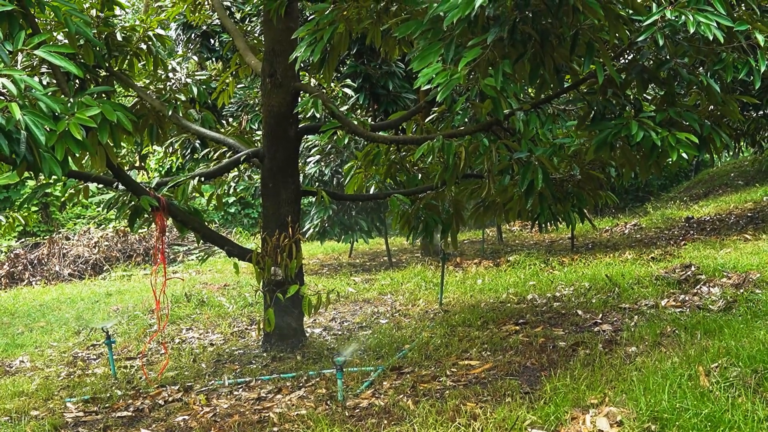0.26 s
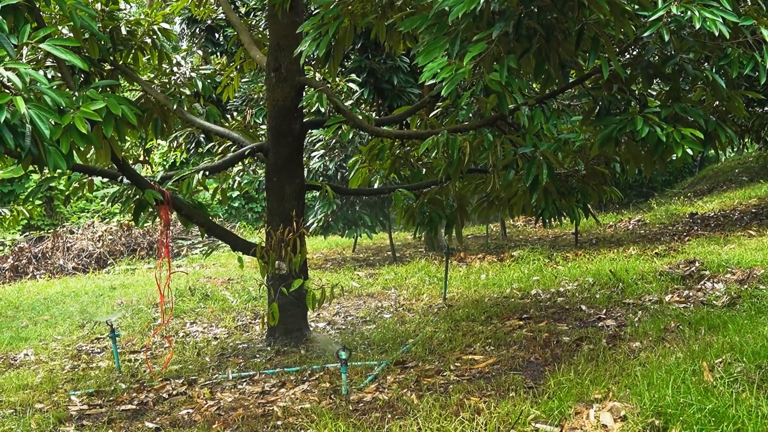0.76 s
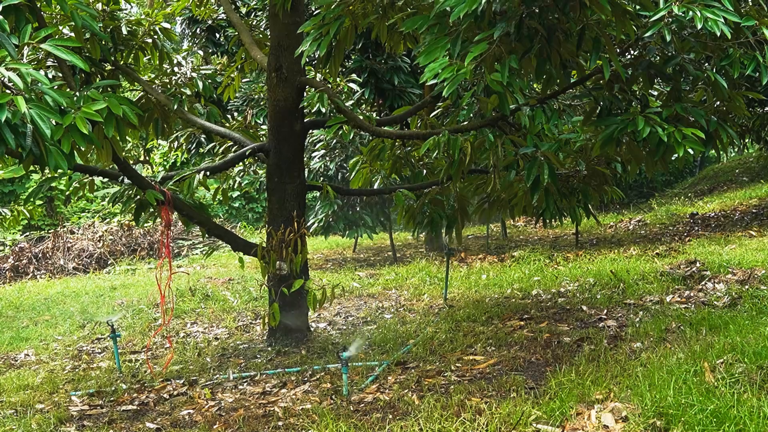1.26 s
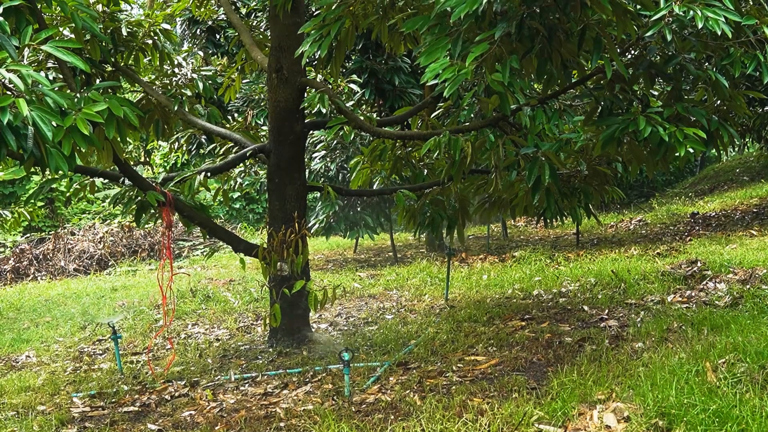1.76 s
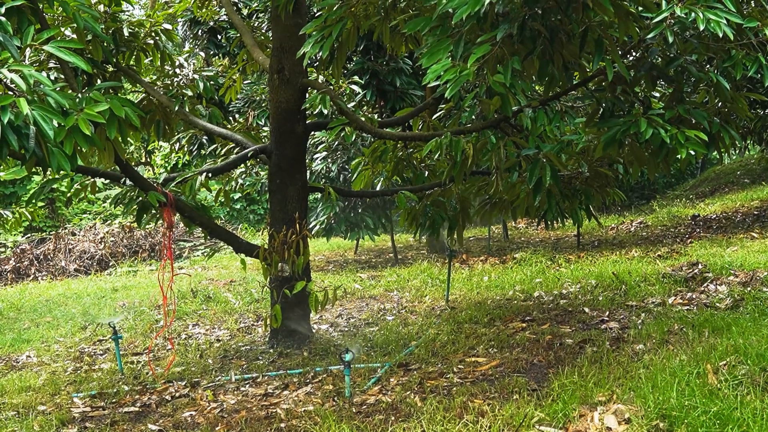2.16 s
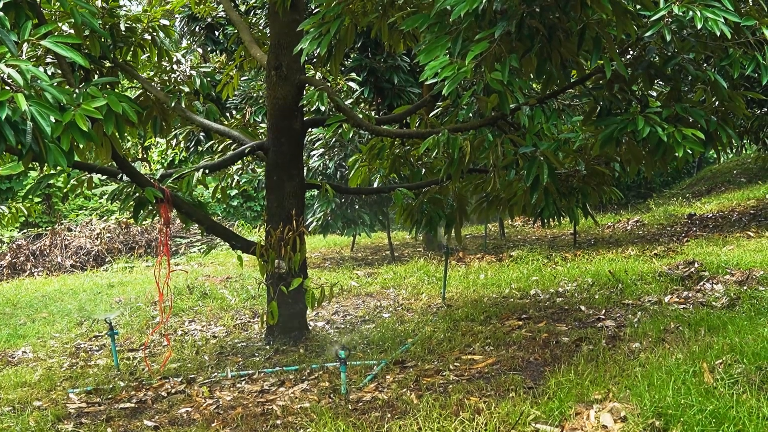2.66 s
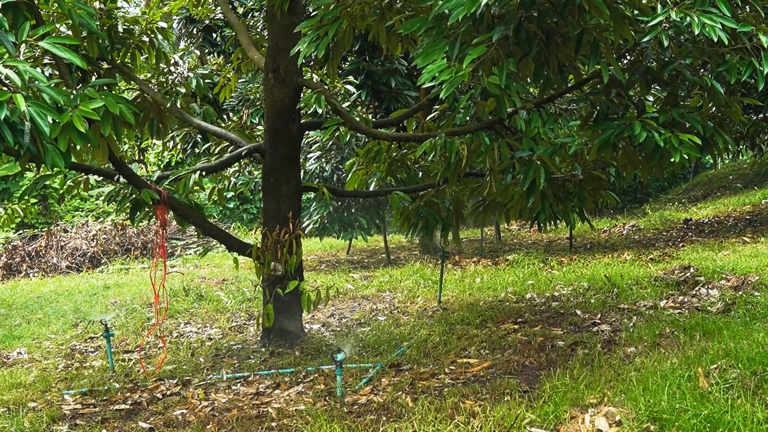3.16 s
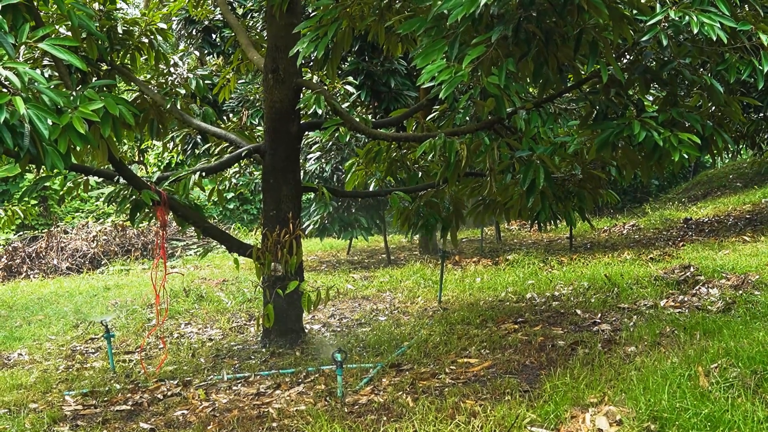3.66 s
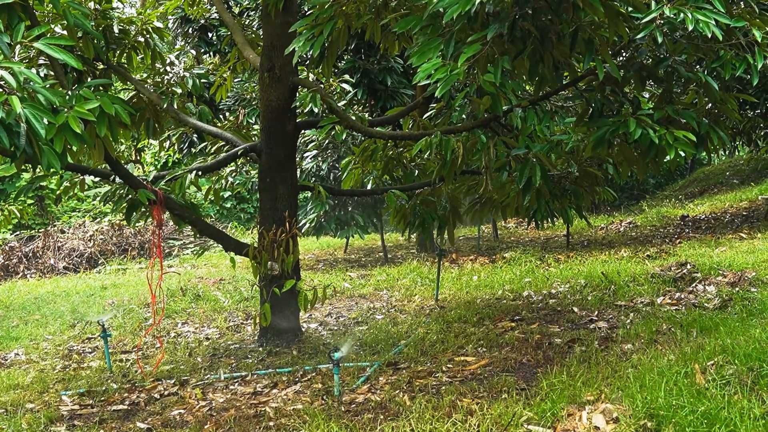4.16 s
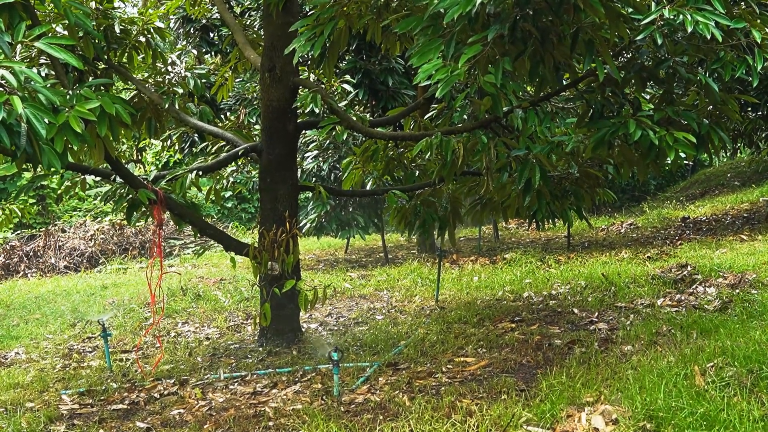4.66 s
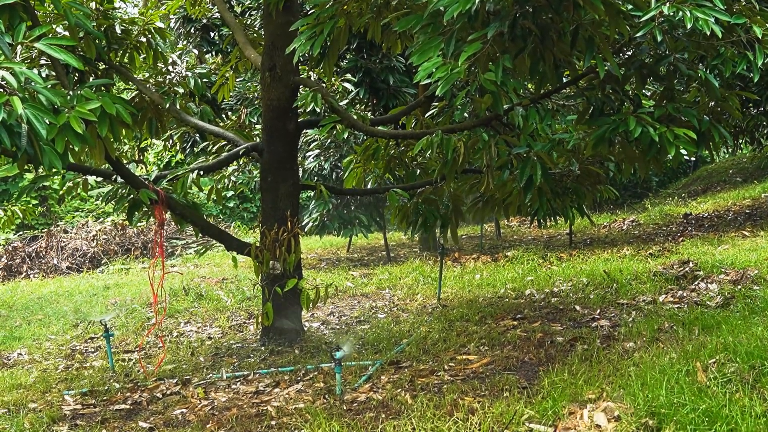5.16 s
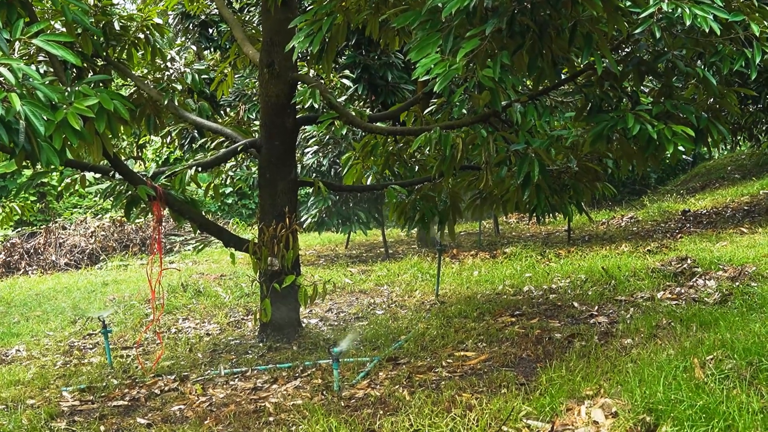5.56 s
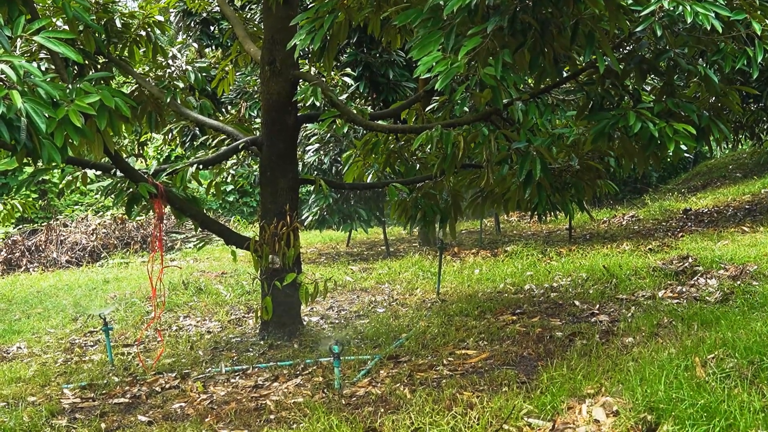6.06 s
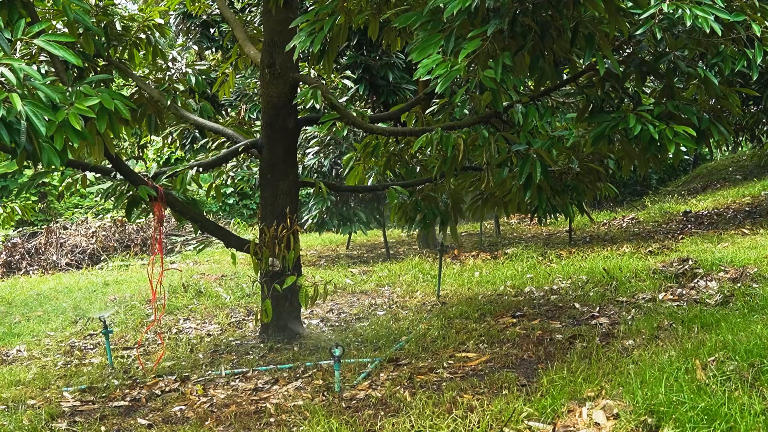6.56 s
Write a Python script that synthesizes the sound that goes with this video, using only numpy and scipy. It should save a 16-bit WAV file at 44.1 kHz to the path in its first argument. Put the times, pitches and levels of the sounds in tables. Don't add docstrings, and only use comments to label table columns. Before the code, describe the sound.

Fluttering sprinkler spray and crisp drips on leaves, with brief high bird whistles, soft distant hoots, a thin insect tone and faint wind rumble.

```python
import sys
import numpy as np
from scipy import signal
from scipy.fft import rfft, irfft
from scipy.io import wavfile
from scipy.ndimage import uniform_filter1d

SR = 44100
rng = np.random.default_rng(int(sys.argv[2]) if len(sys.argv) > 2 else 0)


def decibels_to_gain(level_db):
    exponent = np.asarray(level_db, float) / 20
    return 10 ** exponent


def to_wav(s):
    ch = np.atleast_2d(s).T
    pcm = np.round(np.clip(ch, -1, 1) * 32767)
    wavfile.write(sys.argv[1], SR, pcm.astype(np.int16))


N = 299880
T = np.arange(N) / SR

# (frequency [Hz], level [dB per Hz])
FIZZ = [(1500, -24), (3000, -27), (5000, -1.5), (7500, 0.5), (9600, 2), (11000, -1), (12300, 2),
        (13600, -2), (16000, 1.5)]
# (time [s], speed [turns per s])
FAST_SPIN = [(0, 22.07), (1.4, 21.52), (1.7, 21.22), (3.6, 21.22), (4.2, 21.62), (4.6, 21.32), (5.6, 21.32),
             (6, 21.47), (6.8, 21.44)]
# (time [s], speed [turns per s])
SLOW_SPIN = [(0, 12.5), (1.2, 11.8), (1.9, 13.1), (2.6, 12), (4.5, 11.7), (5.2, 13.2), (6.8, 12.5)]
# (time [s], peak level [dB], lowest frequency [Hz])
DROPS = [(.1576, -17, 4000), (.1626, -23, 900), (.1697, -16, 900), (.9129, -22, 900), (.9262, -25, 6200),
         (1.2111, -21, 900), (1.22, -22, 1900), (1.4232, -13, 1400), (1.7926, -23, 4800),
         (1.8035, -23, 4800), (1.8914, -21, 9400), (2.7098, -24, 900), (2.9537, -20, 900),
         (2.9665, -22, 4800), (2.9703, -22, 6300), (3.6584, -25, 6800), (4.0491, -22, 3500),
         (4.1442, -18, 900), (4.1536, -20, 4300), (4.1889, -23, 1400), (4.5789, -21, 3000),
         (4.8012, -23, 7900), (5.0509, -21, 2900), (5.1085, -24, 900), (5.4562, -15, 900),
         (5.9116, -24, 5300), (5.9209, -24, 900), (5.9407, -21, 900), (5.9805, -25, 8800),
         (5.9835, -24, 9000)]
# (time [s], level [dB], fade time [s],
# centre frequency [Hz])
SHOWERS = [(0.157, -43, 0.028, 3000), (.17, -35.5, 0.036, 6000), (.913, -39, 0.036, 4300),
           (.915, -41, .03, 10000), (1.207, -38, .03, 4200), (1.424, -39, .02, 5000),
           (1.79, -42, .03, 8000), (1.885, -40, .02, 11000), (2.278, -37, .006, 12000),
           (2.955, -37, 0.013, 2500), (2.955, -44, 0.028, 7000), (4.143, -30, 0.0033, 3600),
           (4.152, -37, 0.011, 3500), (4.13, -42, 0.057, 6000), (4.188, -41, 0.023, 9000),
           (5.05, -40, .04, 6500), (5.455, -32, 0.009, 1000), (5.457, -36, .01, 2200),
           (5.458, -41, .03, 5000), (5.92, -39, .04, 5000), (5.968, -38, .03, 10000)]
# (start [s], length [s], top pitch [Hz], opening level [dB], closing level [dB])
WHISTLES = [
    (1.065, 0.1324, 6220, -42.5, -37),
    (4.248, 0.1377, 6100, -38.5, -37),
]
# (start [s], rise time [s], fall time [s], top pitch [Hz], level [dB])
CHIPS = [
    (.929, 0.01, .013, 6300, -40),
    (.963, 0.0071, .004, 6400, -37),
    (4.098, .011, 0.021, 6200, -38.5),
]
# (delay [s], level [dB])
BRANCH_ECHOES = [(.0037, -8), (.0093, -13), (.016, -14)]
# (start [s], first swell pitch [Hz], top pitch [Hz], first swell level [dB], second swell level [dB])
HOOTS = [
    (3.822, 759, 926, -28.5, -38),
    (5.927, 780, 1000, -33, -48),
    (6.317, 810, 890, -33, -41),
    (6.686, 810, 890, -30.5, -36.5),
]
# (start [s], rise time [s], fall time [s], top pitch [Hz], level [dB])
WARBLES = [
    (1.575, .053, 0.028, 730, -44.5),
    (3.965, 0.069, .04, 945, -41.5),
    (4.15, .048, .045, 739, -43.5),
]
# (start [s], length [s], pitch [Hz], level [dB])
OVERTONES = [
    (1.596, .052, 1340, -48),
    (3.97, .055, 1220, -54),
    (4.187, 0.023, 1264, -43),
    (6.325, .02, 1435, -43),
    (6.685, 0.046, 1355, -48.5),
]
# (delay [s], level [dB])
GROUND_ECHOES = [(.0075, -11), (.019, -15)]
# (time [s], level [dB])
INSECT = [(0.0, -54), (0.05, -44.5), (0.97, -44.5), (1.08, -51), (1.19, -46.5), (5.08, -47), (5.15, -53),
          (5.59, -45), (6.16, -48.5), (6.8, -46)]
# (time [s], rate [strokes per s])
STROKES = [(0, 19.2), (1, 18.2), (1.5, 18.7), (3.3, 18.6), (4.3, 19.7), (5.1, 18.2), (6.8, 19.2)]
# (time [s], peak level [dB], half length [s])
GUSTS = [(.05, -37.5, .12), (.62, -40, 0.28), (1.004, -43, .15), (1.38, -33.5, 0.16), (2.06, -31, 0.25),
         (2.626, -38.5, 0.15), (2.96, -30, 0.04), (3.41, -43, 0.47), (4.08, -41.5, 0.28), (4.58, -37, 0.16),
         (5.12, -37.5, .1), (5.775, -39.5, .12)]
# (frequency [Hz], level [dB per Hz])
WIND = [(2, -34), (6, 9), (10, 5.5), (19, 5), (25, -19), (35, -45.5)]
# (frequency [Hz], level [dB per Hz])
FLUTTER = [(15, -30), (24, -16), (35, 11), (50, -5), (70, -12), (120, -49)]
# (frequency [Hz], level [dB per Hz])
MIST = [(35, -33), (60, -2), (152, -7), (413, -10), (1320, -7.5), (1700, -8.5), (3600, -10.5), (4520, -11),
        (5710, -14), (7500, -14.5), (9600, -18), (11000, -20), (12300, -19), (15500, -23)]
# (time [s], level [dB])
MIST_SWELL = [(0.0, 0.5), (6.8, 1)]

HARMONIC_DB = -23


def jets():
    fast = sweep(FAST_SPIN, .45, 1.5)
    slow = sweep(SLOW_SPIN, -.38, .85)
    sputter = decibels_to_gain(2.8 * np.tanh(.5 * wander(.0053)))
    facing = (.3 + .84 * fast + .81 * slow) * sputter
    size_db = 2.6 * np.minimum(rng.exponential(1, (4, N)), 4)
    size = decibels_to_gain(size_db) * rng.standard_normal((4, N))
    droplets_per_s = 2500
    landed = size * (rng.random((4, N)) < droplets_per_s / SR) * facing
    pitches_hz = (4560, 7140, 10400, 13800)
    droplets = sum(resonate(row, hz, 5000) for row, hz in zip(landed, pitches_hz))
    level_db = -47 + 1.7 * wander(.019)
    return decibels_to_gain(level_db) * coloured(droplets, FIZZ)


def sweep(speed, start_turn, sharpness):
    turns = start_turn + np.cumsum(curve(speed)) / SR
    return np.exp(sharpness * (np.cos(2 * np.pi * turns) - 1))


def drops():
    out, t = np.zeros(N), np.arange(160) / SR
    stray = rng.uniform((0, -29.5, 3500), (T[-1], -25.5, 10000), (28, 3))
    rows = np.vstack([DROPS, stray])
    rag = rng.standard_normal((len(rows), len(t)))
    for (s, db, low_hz), noise in zip(rows, rag):
        high_hz = 9500 + .5 * low_hz
        leaf = signal.butter(3, [low_hz, high_hz], "band", fs=SR, output="sos")
        rattle = .2 * noise * np.exp(-t / .0007) * (t > 0)
        snap = signal.sosfilt(leaf, rattle - (t == 0))
        add(out, max(s - 3 / SR, 0), decibels_to_gain(db) * snap / abs(snap).max())
    return out


def showers():
    out, t = np.zeros(N), np.arange(6000) / SR
    grit = rng.standard_normal((len(SHOWERS), len(t), 2))
    for (s, db, fade_s, hz), g in zip(SHOWERS, grit):
        uneven = g[:, 0] * np.exp(.79 * g[:, 1])
        patter = evened(resonate(uneven, hz, .61 * hz))
        add(out, s, decibels_to_gain(db) * patter * np.exp(-t / fade_s))
    return out


def small_bird():
    song = [whistle(*row) for row in WHISTLES] + [chip(*row) for row in CHIPS]
    return sung(song, BRANCH_ECHOES)


def whistle(start, length, top_hz, opening_db, closing_db):
    t = np.linspace(0, length, num=90)
    opening_s, closing_s, swell_s = .026, .021, .023
    scoop = .25 * np.exp(-t / .0097)
    sag = .31 * (t / .138) ** 2.5
    hz = top_hz * (1 - scoop - sag)
    opening = swell(t, opening_s, swell_s, opening_db)
    closing = swell(t, length - closing_s, swell_s, closing_db)
    beads_db = 3 * np.cos(2 * np.pi * 67.5 * (t - opening_s))
    return np.transpose([start + t, hz, joined([-44.5, opening, closing]) + beads_db])


def chip(start, rise_s, fall_s, top_hz, db):
    t = np.linspace(0, rise_s + fall_s, num=40)
    scoop = np.maximum(1 - t / rise_s, 0) ** 3
    drop = 1 - np.exp(-np.maximum(t - rise_s, 0) / .008)
    hz = top_hz - 1280 * scoop - 2290 * drop
    fade_db = -11 * (scoop + (t / t[-1]) ** 3)
    return np.transpose([start + t, hz, db + fade_db])


def far_bird():
    hoots = [hoot(*row) for row in HOOTS]
    warbles = [warble(*row) for row in WARBLES]
    overtones = [overtone(*row) for row in OVERTONES]
    return sung(hoots + warbles + overtones, GROUND_ECHOES)


def hoot(start, swell_hz, top_hz, first_db, second_db):
    first_s, linger_s, top_s, fall_s = .021, .013, .051, .036
    rest_hz, drop_s = 560, .0187
    t = np.linspace(0, top_s + fall_s, num=90)
    climb = np.interp(t, [0, first_s, first_s + linger_s, top_s],
                      [swell_hz - 136, swell_hz, swell_hz + 30, top_hz])
    relax = np.exp(-np.maximum(t - top_s, 0) / drop_s)
    hz = rest_hz + (climb - rest_hz) * relax
    body_db = -44.5 - 9 * (2 * t / t[-1] - 1) ** 2
    first = swell(t, first_s, .01, first_db)
    second = swell(t, top_s, .012, second_db)
    return np.transpose([start + t, hz, joined([body_db, first, second]), HARMONIC_DB + 0 * t])


def warble(start, rise_s, fall_s, top_hz, db):
    start_hz, end_hz = 480, 566
    top, late = start + rise_s, .7
    late_hz = top_hz + late * (end_hz - top_hz)
    return [(start, start_hz, db - 3, HARMONIC_DB),
            (top, top_hz, db - 4, HARMONIC_DB),
            (top + late * fall_s, late_hz, db, HARMONIC_DB),
            (top + fall_s, end_hz, db - 7, HARMONIC_DB)]


def overtone(start, length, hz, db):
    return [(start, .98 * hz, db + 2), (start + .37 * length, hz, db), (start + length, hz, db - 3)]


def sung(notes, echoes):
    out, t = np.zeros(N), np.arange(12000) / SR
    for rows in notes:
        add(out, *note(rows))
    scatter_db, fade_60db_s = -13, .12
    tail = rng.standard_normal(len(t)) * decibels_to_gain(-60 * t / fade_60db_s) * (t > .004)
    space = decibels_to_gain(scatter_db) * tail / np.linalg.norm(tail) + (t == 0)
    for delay_s, db in echoes:
        add(space, delay_s, decibels_to_gain([db]))
    return signal.fftconvolve(out, space)[:N]


def note(rows):
    s, hz, db, *harmonics_db = np.transpose(rows)
    t = np.arange(s[0], s[-1], 1 / SR)
    glide = uniform_filter1d(np.interp(t, s, hz), 90, mode="nearest")
    phase = 2 * np.pi * np.cumsum(glide) / SR
    tone = np.sin(phase)
    for harmonic_db in harmonics_db:
        tone = tone + decibels_to_gain(np.interp(t, s, harmonic_db)) * np.sin(2 * phase)
    loudness = np.sqrt(2) * decibels_to_gain(np.interp(t, s, db))
    return s[0], loudness * tone * signal.windows.tukey(len(t), .05)


def insect():
    throb = .95 + sweep(STROKES, -.36, 3.5)
    scrape = rng.standard_normal(N) * throb
    for _ in range(3):
        scrape = resonate(scrape, 7012, 260)
    return decibels_to_gain(curve(INSECT) - 3.5) * evened(scrape)


def wind():
    calm_db = -45.5
    gust_db = joined([calm_db] + [swell(T, s, half_s, db) for s, db, half_s in GUSTS])
    lumps = decibels_to_gain(gust_db) * coloured(rng.standard_normal(N), WIND)
    flutter_db = -49.5 + .56 * (gust_db - gust_db.mean()) - 1.1 * T
    return lumps + decibels_to_gain(flutter_db) * coloured(rng.standard_normal(N), FLUTTER)


def mist():
    return decibels_to_gain(-39 + curve(MIST_SWELL)) * coloured(rng.standard_normal(N), MIST)


def evened(x):
    return x / np.sqrt(np.mean(x ** 2) + 1e-20)


def curve(rows):
    return np.interp(T, *np.transpose(rows))


def coloured(x, points):
    hz, db = np.transpose(points)
    at = np.fft.rfftfreq(len(x), 1 / SR)
    colour_db = np.interp(np.log(at + 1), np.log(hz + 1), db)
    return evened(irfft(rfft(x) * decibels_to_gain(colour_db), len(x)))


def wander(span_s):
    size = int(span_s * SR)
    return evened(uniform_filter1d(uniform_filter1d(rng.standard_normal(N), size), size))


def add(mix, s, sound):
    part = mix[round(s * SR):][:len(sound)]
    part += sound[:len(part)]


def resonate(x, hz, width_hz):
    return signal.lfilter(*signal.iirpeak(hz, max(hz / width_hz, .3), SR), x)


def swell(t, at, width, db):
    return db - 10 * (abs(t - at) / width) ** 1.84


def joined(parts):
    return 10 * np.log10(sum(decibels_to_gain(part) ** 2 for part in parts))


def scene():
    water = jets() + drops() + showers() + mist()
    mix = water + small_bird() + far_bird() + insect() + wind()
    return np.tile(mix, (2, 1))


def low_pass(x):
    return signal.sosfilt(signal.butter(12, 16920, fs=SR, output="sos"), x)


def record(dry):
    edge = signal.firwin(1023, 15740, window=("kaiser", 10), fs=SR)
    finished = signal.oaconvolve(dry, edge[None], "same")
    return low_pass(finished)


dry = scene()
out = record(dry)
to_wav(out)
```